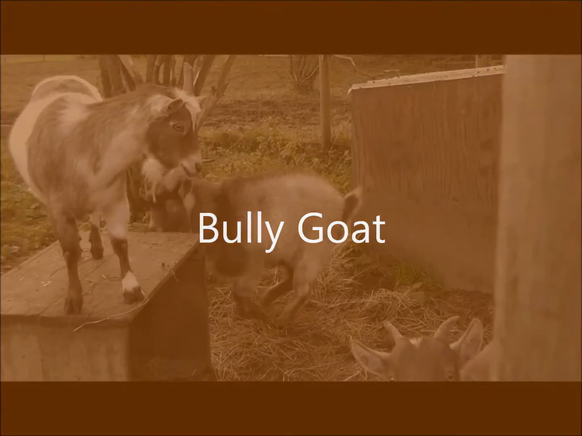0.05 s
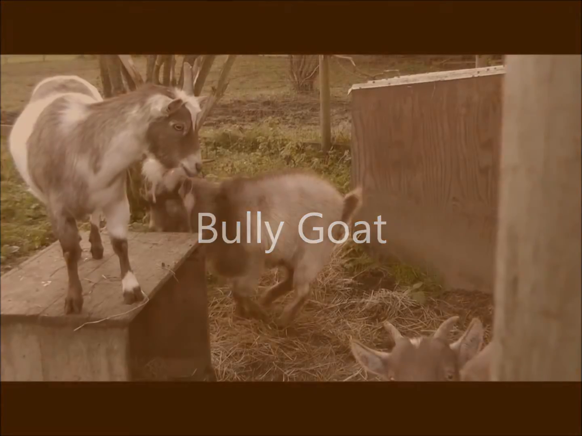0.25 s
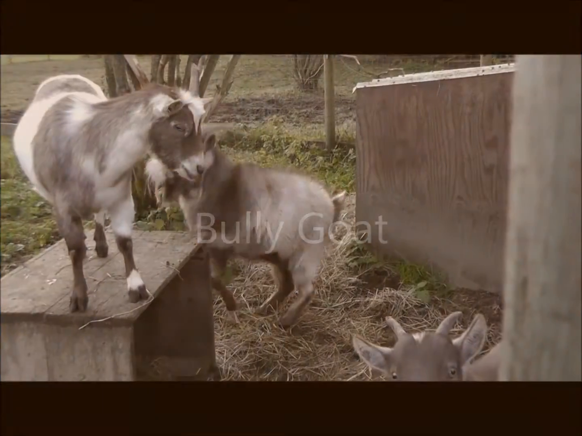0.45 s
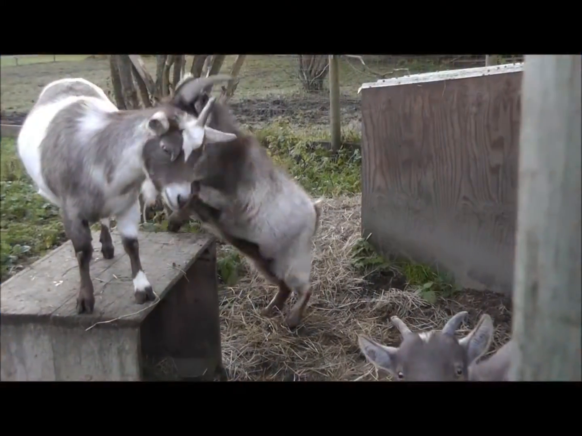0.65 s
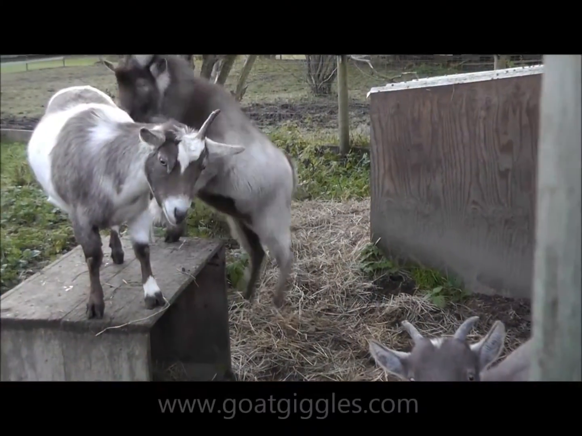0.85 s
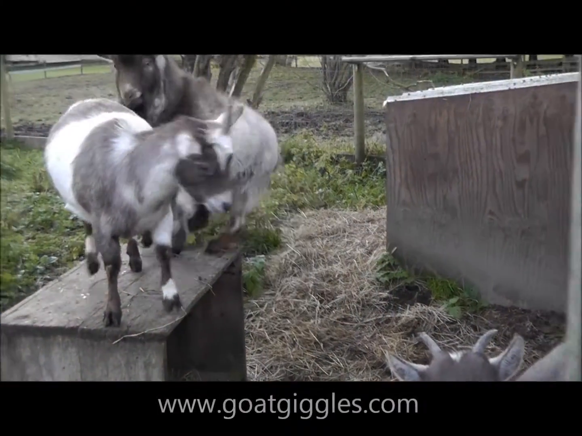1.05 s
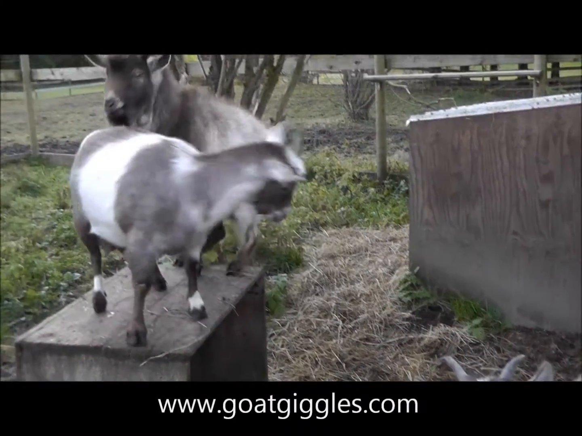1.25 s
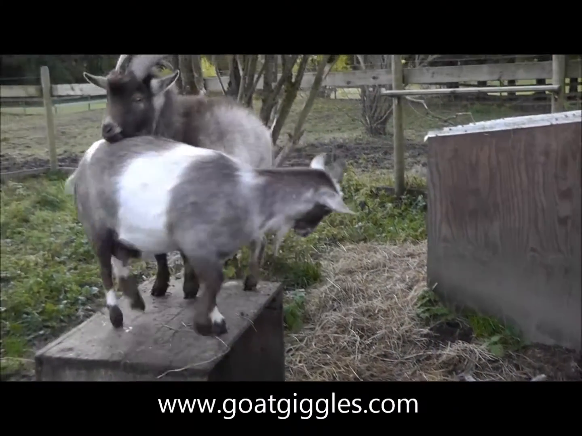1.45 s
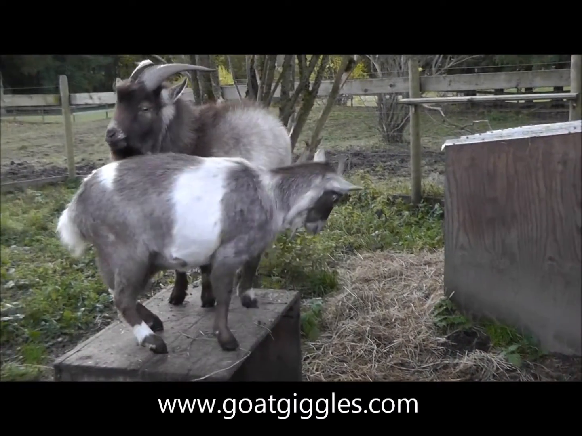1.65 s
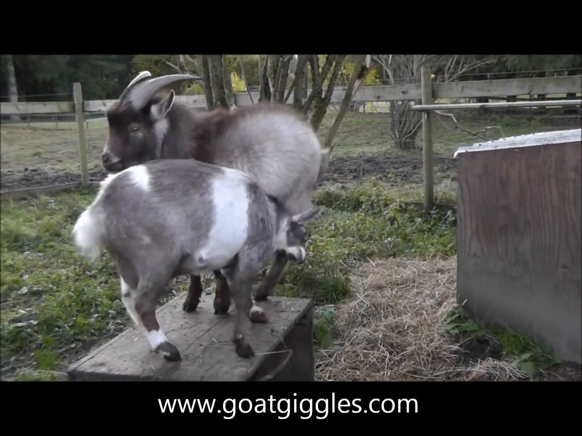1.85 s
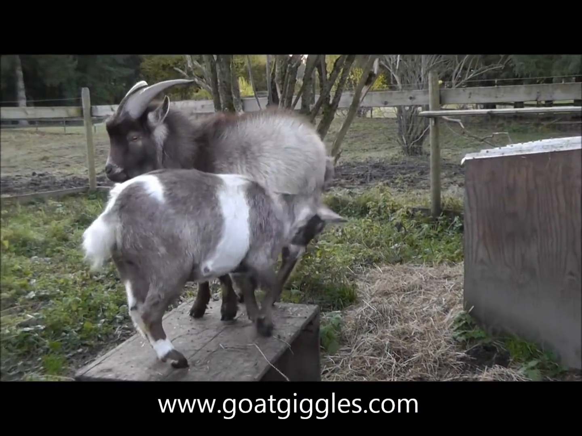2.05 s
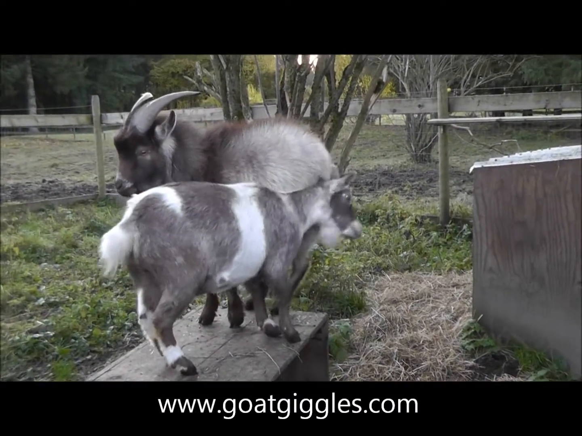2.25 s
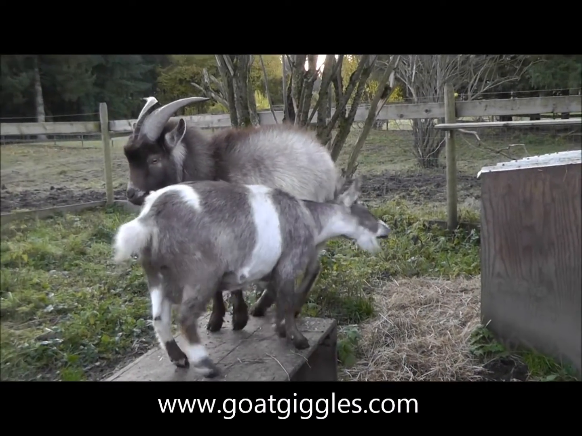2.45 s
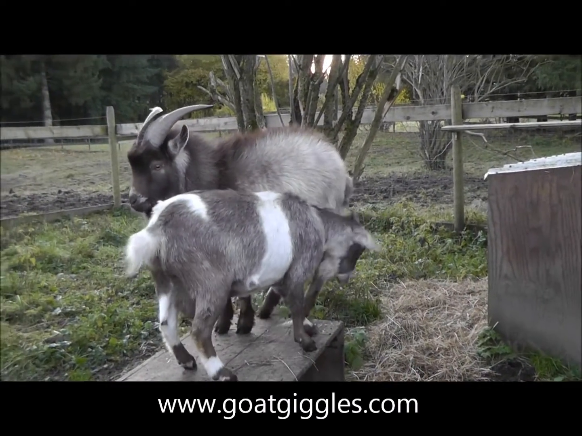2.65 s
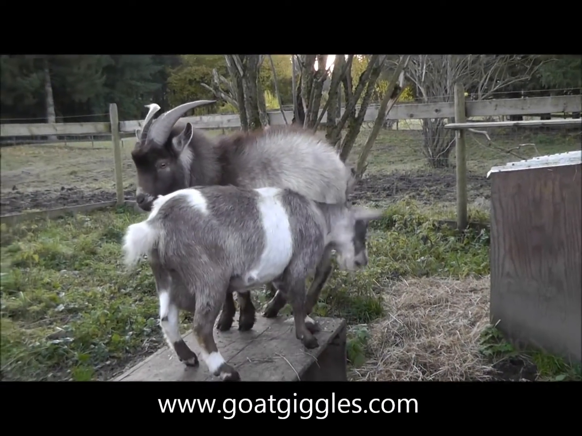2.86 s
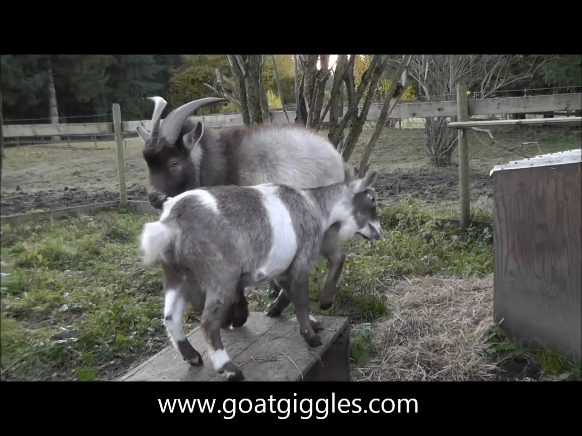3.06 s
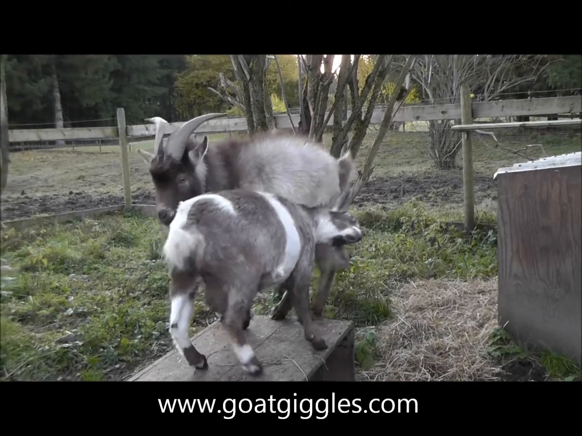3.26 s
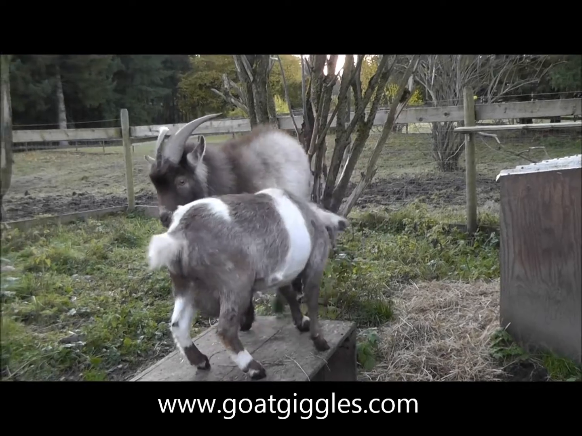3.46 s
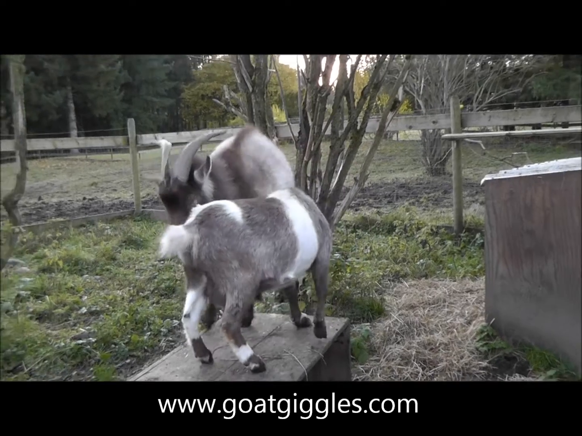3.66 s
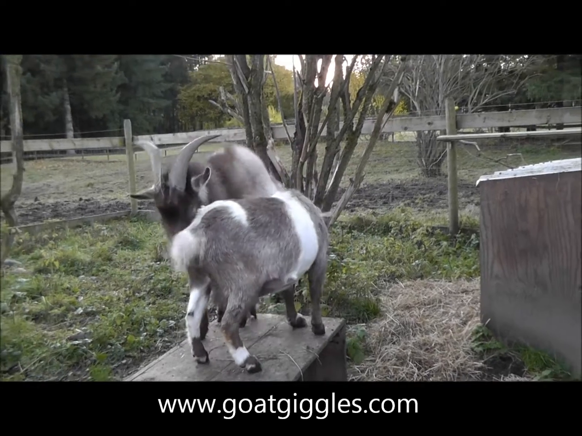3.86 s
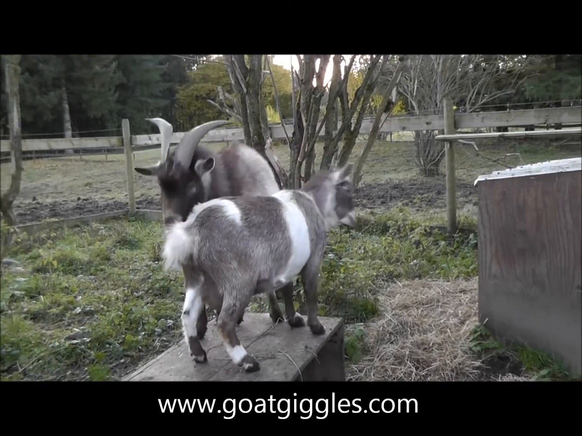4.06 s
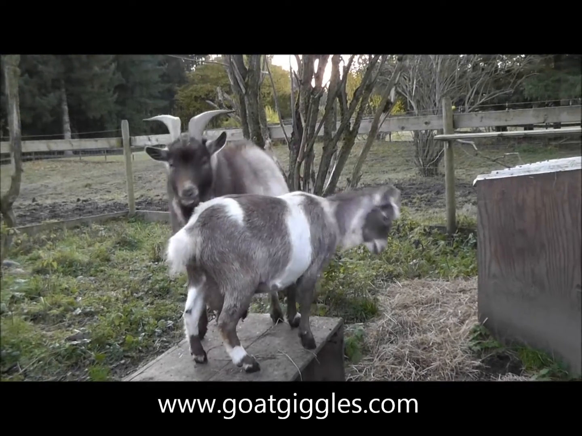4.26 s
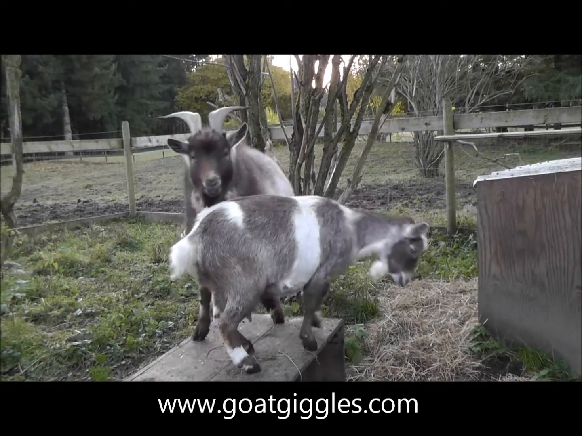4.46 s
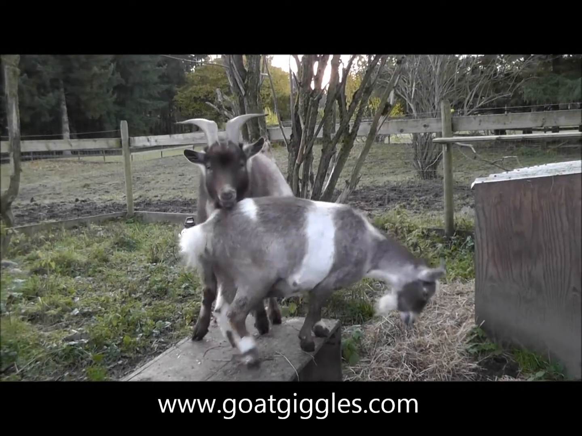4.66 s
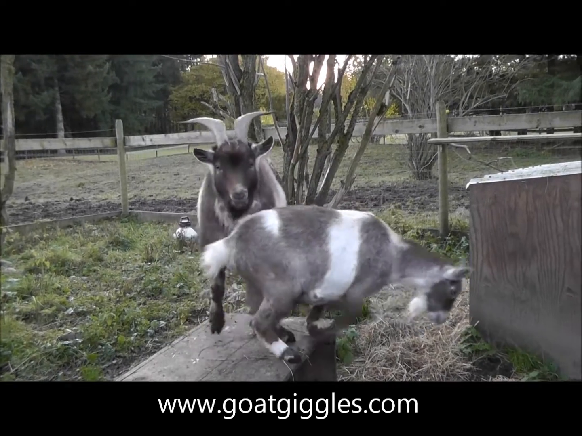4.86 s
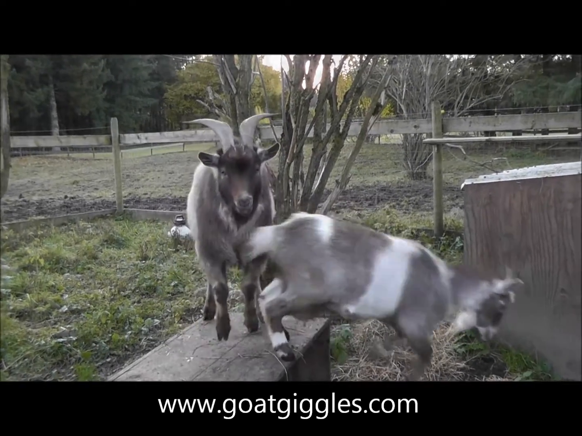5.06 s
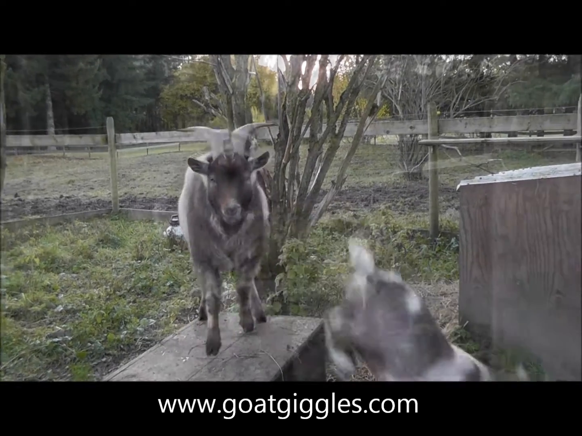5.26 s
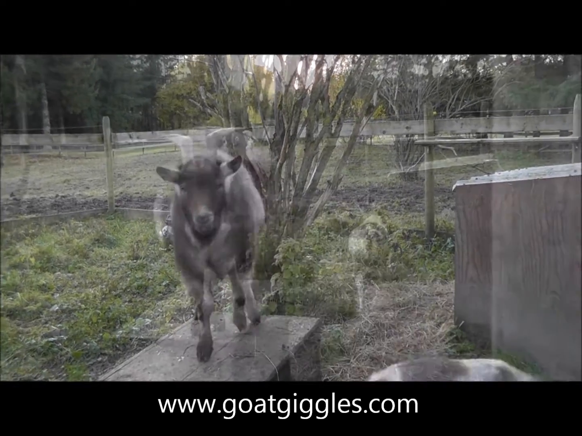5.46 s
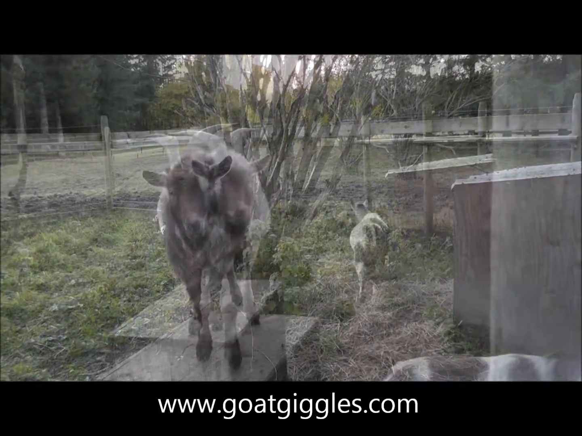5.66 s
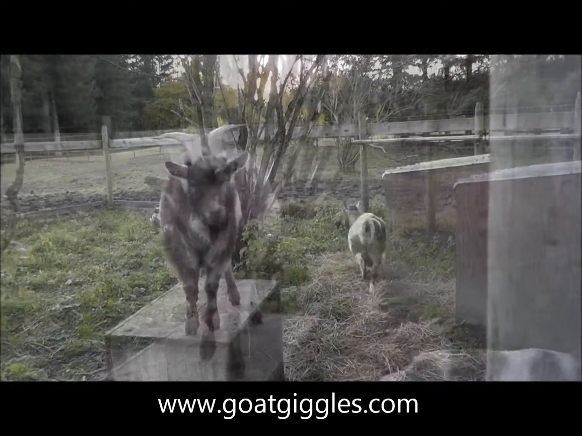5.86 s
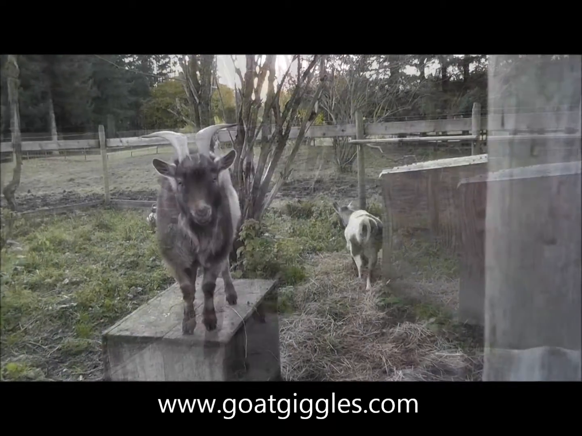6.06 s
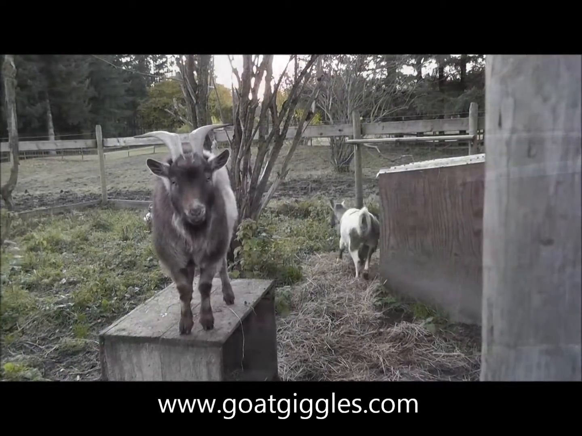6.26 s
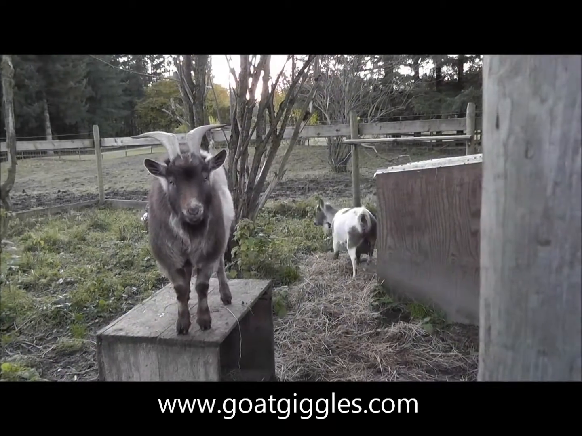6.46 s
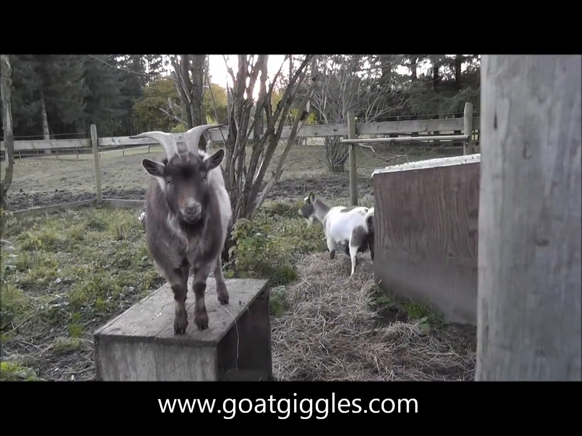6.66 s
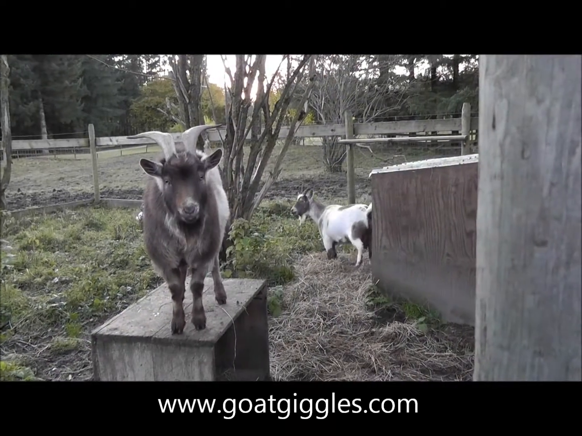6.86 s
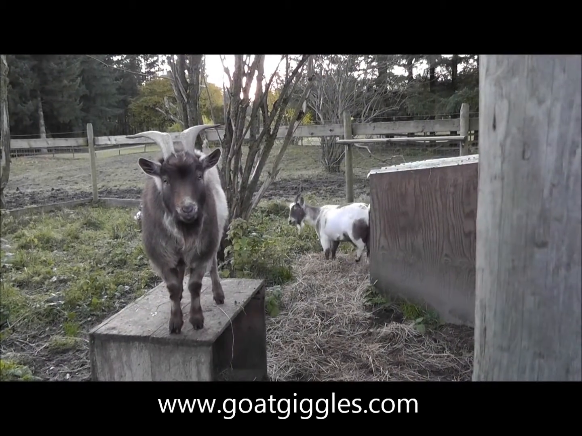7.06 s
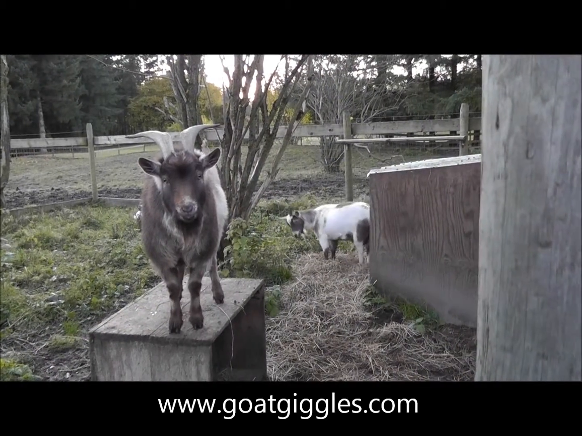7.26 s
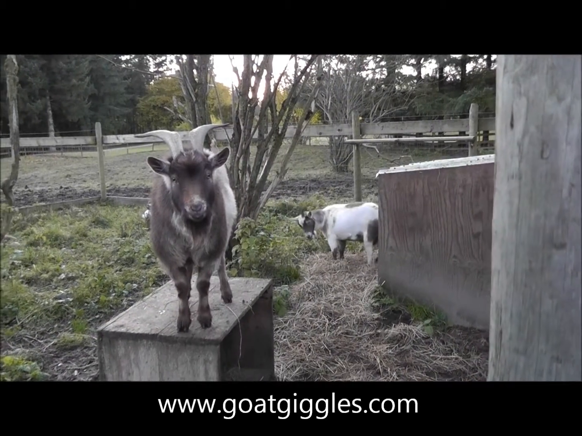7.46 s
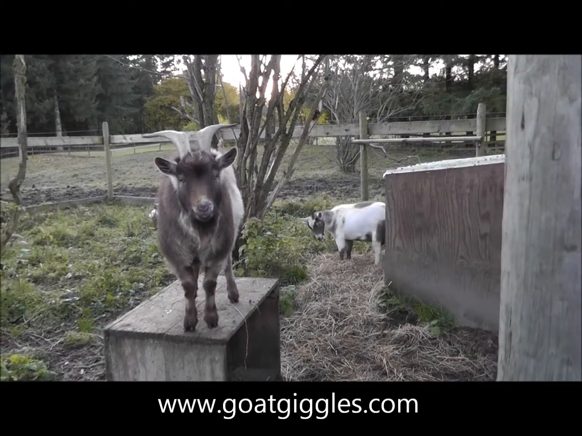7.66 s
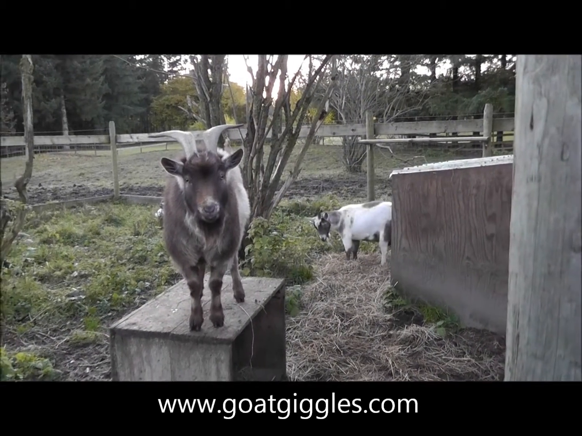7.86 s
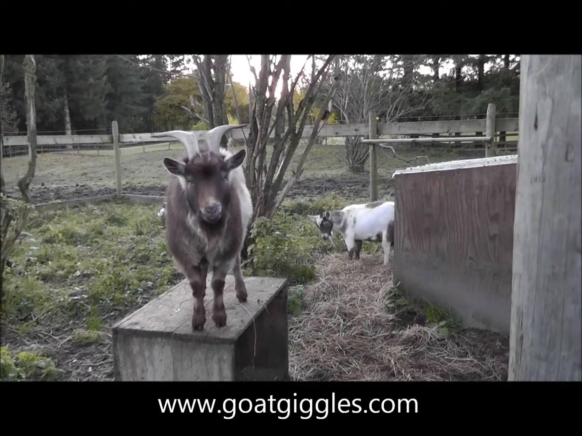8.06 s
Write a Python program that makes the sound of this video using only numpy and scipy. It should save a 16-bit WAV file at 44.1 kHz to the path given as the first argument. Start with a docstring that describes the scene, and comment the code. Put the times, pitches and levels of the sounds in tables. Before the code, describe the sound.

Goats jostle on hollow boards with sharp knocks and scuffs, four shaky bleats, a dull jump into straw, over quiet rumble and hum.

```python
"""Goats on a wooden stand

Goats jostle on a hollow wooden stand in an open pen, heard in stereo with scattered echoes around them.
Bleats come as hoarse throbs, about ten a second: glottal pulses and breath through throat and mouth resonances.
Hooves knock and skid, ringing the modes of the boards; heavy steps boom, and a jump lands dully in the straw.
Straw and coats rustle as crackling noise bands. Behind lie rumbling noise and hums of wavering tones;
midway one hum fades into another."""
import sys
import numpy as np
from scipy import signal
from scipy.io import wavfile
from scipy.ndimage import uniform_filter1d

SR = 44100
rng = np.random.default_rng(int(sys.argv[2]) if len(sys.argv) > 2 else 0)


def wav_record(signal):
    """Record a signal, one row per channel, as 16-bit PCM in the file named by sys.argv[1]."""
    frames = np.transpose(np.atleast_2d(signal))
    bounded = np.clip(frames, -1, 1)
    # unit amplitude maps onto the largest positive 16-bit level
    quanta = np.round(bounded * 32767).astype(np.int16)
    wavfile.write(sys.argv[1], SR, quanta)


N = 357562


def amp(db):
    """Turn dB into gain."""
    return 10 ** (np.asarray(db) / 20)


def rms_one(x):
    """Scale to rms 1."""
    return x / np.sqrt(np.mean(x ** 2) + 1e-20)


def at_hz(points, hz):
    """Read a curve of (Hz, value) points on a log frequency axis."""
    points = np.array(points)
    return np.interp(np.log(hz), np.log(points[:, 0]), points[:, 1])


def add(out, s, x):
    """Mix x into out from time s in seconds."""
    i = round(s * SR)
    out[..., i:i + x.shape[-1]] += x[..., :N - i]


def drift(rate_hz):
    """Slow random wander of rms 1: noise through two equal low-pass poles, run at SR / 40."""
    pole = np.exp(-80 * np.pi * rate_hz / SR)
    white = rng.standard_normal(N // 40 + 2002)
    slow = signal.lfilter([1], [1, -2 * pole, pole * pole], white)[2000:]   # drop the settling
    return np.interp(np.arange(N) / 40, np.arange(len(slow)), rms_one(slow))


def resonance(x, hz, width_hz):
    """Two-pole band resonance with a gain of 1 at its top."""
    r = np.exp(-np.pi * width_hz / SR)
    zeros = np.array([1, 0, -1]) * (1 - r * r) / 2
    return signal.lfilter(zeros, [1, -2 * r * np.cos(2 * np.pi * hz / SR), r * r], x)


def banded_noise(spectrum, patchy_db, low_hz, count):
    """Half-octave bands of stereo noise, each with its own level, flicker and left-right likeness."""
    # how alike left and right are: hz, likeness (ratio)
    likeness = [(300, 0.71), (1400, 0.16), (3100, 1), (15000, 0.62)]
    out, together = 0, drift(7.3)
    white = rng.standard_normal((2, 2, N))   # neighbouring bands take different noise
    for k in range(count):
        low = low_hz * 2 ** (k / 2)
        band = signal.butter(2, [low, low * np.sqrt(2)], "band", fs=SR, output="sos")
        mid, side = signal.sosfilt(band, white[k % 2])
        centre_hz = low * 2 ** (1 / 4)
        alike = np.clip(at_hz(likeness, centre_hz), -1, 1)
        gain = amp(at_hz(spectrum, centre_hz) + patchy_db * (together + drift(4.0)))
        out = out + gain * (np.sqrt(1 + alike) * mid + np.sqrt(1 - alike) * side * [[1], [-1]])
    return rms_one(out)


def cavity(source, resonances, shift=1):
    """Air in throat or mouth: parallel resonances of alternating sign, moved by the ratio shift."""
    out = 0
    for k, (hz, width_hz, db) in enumerate(resonances):
        ring = resonance(resonance(source, hz * shift, width_hz), hz * shift, 4 * width_hz)
        out = out + (-1) ** k * amp(db) * ring
    return out


def breath_rasp(excitation, shift, treble_db):
    """Hiss of breath in broad bands, those above the mouth resonances set by treble_db."""
    # hiss bands: centre_hz (before the mouth shift), width_hz, level_db (before treble_db)
    rasp_bands = [(3720, 1160, -9.5), (5070, 180, -21), (6410, 2920, -15), (9900, 42000, -25.5)]
    out = 0
    for hz, width_hz, db in rasp_bands:
        band = resonance(resonance(excitation, hz * shift, width_hz), hz * shift, 2 * width_hz)
        out = out + amp(db + treble_db * (hz > 4810)) * rms_one(band)
    return out


def glottis(t, length, middle_hz, glide_hz, rough):
    """The folds give pulses of 29 harmonics with uneven pitch and strength, and breath gated each cycle."""
    chance = rng.standard_normal((3, len(t)))
    wobble = rms_one(uniform_filter1d(chance[0], size=350))
    # the folds tighten at the height of the push, in some throbs more than in others
    arch = 1 + rng.uniform(.03, .19) * (np.exp(-(2 * t / length) ** 2) - .5)
    ends_hz = [middle_hz - glide_hz / 2, middle_hz + glide_hz / 2]
    pitch = np.interp(t, [-length / 2, length / 2], ends_hz) * arch * (1 + .022 * rough * wobble)
    phase = np.cumsum(pitch) / SR   # in cycles
    shimmer = amp(4 * rough * rms_one(uniform_filter1d(chance[1], size=100)))
    harmonics = np.arange(1, 30)[:, None]
    pulses = rms_one(shimmer * np.cos(2 * np.pi * harmonics * phase).sum(axis=0))
    breath = rms_one(chance[2] * np.exp(-6 * (phase % 1)))
    return pulses, breath


def bleats(low_lag_s=0.006, closing=0.032, voiced_rasp=1.1, throat_db_per_shift=-40):
    """Each throb sends pulses and breath through throat and mouth, under a swelling envelope."""
    # throbs: centre_s, length_s, level_db (mouth rms ahead of its swell), pitch_hz and glide_hz across
    # the throb (before arch and wobble), mouth_shift (ratio)
    throbs = [(2.649, 0.036, -35, 360.6, -33, 1.03), (2.743, 0.038, -36, 474, -4, 0.97),
              (2.827, 0.043, -17, 440, -41.5, 0.97), (2.933, 0.047, -23, 388, -12, 1.1),
              (3.018, 0.05, -20.5, 401.2, -19, 1.04), (3.1, 0.024, -23, 353.8, -40.5, 1.046),
              (4.983, 0.052, -44.5, 411.3, 24, 1.02), (5.087, 0.04, -23.5, 429, 35.5, 0.94),
              (5.177, 0.056, -23.5, 417, 30.5, 0.92), (5.275, 0.054, -22.5, 429.3, 34.5, 0.93),
              (5.377, 0.055, -24.5, 414, 7, 0.93), (5.682, 0.044, -41.5, 355, 9.5, 1.05),
              (5.78, 0.038, -40, 446, -17.5, 0.92), (5.891, 0.033, -20, 454.3, -62.5, 0.93),
              (5.979, 0.041, -19, 444, 65, 0.96), (6.078, 0.052, -20.5, 462.5, 45.5, 0.96),
              (6.167, 0.057, -27, 376.4, -39, 0.99), (6.934, 0.035, -44, 331, 31, 1.2),
              (7.028, 0.04, -21, 386, 29, 1.07), (7.117, 0.031, -19.5, 400, 42, 1.05),
              (7.22, 0.044, -24.5, 414.4, 29, 0.95), (7.315, 0.056, -25.5, 317.1, -30, .98)]
    # how the goat holds its voice: time_s, roughness (0-1), treble_db, peak_lateness (-1 to 1)
    voice_hold = [(2.65, 0.54, -0.5, 0.3), (2.829, 0.37, -1, -0.5), (3.099, 0.5, -3, 0.7),
                  (5.09, 0.38, -6, 0.1), (5.889, 0.26, -3, -0.2), (6.17, 0.54, -4.5, 0.3),
                  (6.93, 0.34, -4, 0.5), (7.32, 0.7, -1, -0.1)]
    # throat resonances: hz, width_hz, level_db (before the mouth opens)
    throat_modes = [(650, 172, 4.5), (1540, 236, -4.5), (2076, 92, 5.5)]
    # mouth resonances: hz (before the mouth shift), width_hz, level_db
    mouth_modes = [(2943, 400, 6), (3610, 320, 12), (4150, 200, 1.5), (4810, 830, -7)]
    out = np.zeros(N)
    when, *manner = np.transpose(voice_hold)
    t = np.arange(-.1, .1, 1 / SR)
    for s, length, level_db, middle_hz, glide_hz, shift in throbs:
        rough, treble_db, lateness = (np.interp(s, when, column) for column in manner)
        pulses, breath = glottis(t, length, middle_hz, glide_hz, rough)
        through = t / length + .5   # 0 at the start of the throb, 1 at its end
        rough = np.clip(rough + .13 * np.clip(through, 0, 2) ** 2, 0, 1)   # hoarser as the push fades
        source = np.sqrt(1 - rough ** 2) * pulses + rough * breath

        # the mouth sinks from shift + closing to shift - closing
        wide = cavity(source, mouth_modes, shift + closing)
        narrow = cavity(source, mouth_modes, shift - closing)
        mouth = wide + np.clip(through, 0, 1) * (narrow - wide)
        # the low throat weakens as the mouth opens
        throat = amp(throat_db_per_shift * (shift - 1)) * cavity(source, throat_modes)
        rasp = breath_rasp(breath + voiced_rasp * source, shift, treble_db) * np.std(mouth)

        # an early peak breaks in fast, a late one breaks off
        lateness, reach = np.clip(lateness, -.9, .9), 0.53 * length
        u = t - lateness * reach
        mouth_swell = np.exp(-(abs(u) / (reach * (1 - lateness * np.sign(u)))) ** 4.0)
        throat_swell = np.exp(-(abs(t - low_lag_s) / (.5 * length)) ** 2)   # peaks low_lag_s late
        rasp_swell = np.exp(-(t / (np.where(t < 0, .7, 1.1) * length)) ** 2)
        throb = mouth * mouth_swell + rasp * rasp_swell + throat * throat_swell
        add(out, s + t[0], throb * amp(level_db) / np.std(mouth))
    return out


def knocks(deep_db=-16, soft_hz=1800, lag_s=0.00256, knock_contact_s=0.0045):
    """A short uneven contact drives every mode of the stand at a chance strength; lower modes start later."""
    # hooves knock on the boards: time_s, peak_db (middle modes), upper_modes_db (against the middle)
    hoof_knocks = [(0.797, -8, -21), (0.903, -15.5, -2.5), (1.242, -18, -5.5), (1.622, -15, -1.5),
                   (2.06, -26, -31), (2.226, -14, -3), (2.537, -21, -2.5), (3.112, -25.5, 3.5),
                   (3.207, -30, 5.5), (3.333, -8.5, -6.5), (3.746, -3, -9.5), (3.801, -35.5, 14),
                   (4.068, -32.5, 16), (4.253, -24, -0.5), (4.459, -12.5, -1.5), (4.567, -24, 4),
                   (4.6, -7, -28), (4.794, -17, -5.5), (4.843, -16.5, -2), (5.357, -13.5, -8.5),
                   (6.183, -24.5, 2)]
    # hooves skid on the boards: as above, then contact_s (the push fades over 2.62 contacts)
    skids = [(1.049, -19.5, -6, 0.015), (1.117, -15, -5.5, 0.0074), (1.164, -14, -3.5, 0.0082),
             (1.463, -24.5, -15, 0.0051), (1.533, -11.5, -0.5, 0.007), (1.722, -12, -3.5, 0.01),
             (3.437, -35.5, 22.5, 0.016), (3.678, -31.5, 6.5, 0.012), (5.456, -7, -35, 0.027)]
    # modes of the stand: hz (before detuning), level_db (before chance and group levels), t60_s
    stand_modes = [(126, 14, 0.105), (256, 0, 0.033), (634, -4, 0.037), (724, 4.5, 0.024),
                   (860, -5.5, 0.027), (1189, 1, 0.015), (1850, -5, 0.0041)]
    out, t = np.zeros(N), np.arange(SR // 2) / SR
    edges_hz = [60, 190, 450]   # lower edges of the deep, middle and upper modes
    soft = signal.butter(3, soft_hz, fs=SR, output="sos")   # horn on wood is a soft contact
    contacts = [(*knock, knock_contact_s) for knock in hoof_knocks] + skids
    for s, peak_db, upper_db, contact_s in contacts:
        push = np.minimum(t / 0.0038, 1) * np.exp(-(t / (2.62 * contact_s)) ** 2.25)
        force = rng.standard_normal(len(t)) * push
        groups = np.zeros((len(edges_hz), len(t)))
        chances = rng.standard_normal((len(stand_modes), 2))
        for (hz, db, t60), (luck, spot) in zip(stand_modes, chances):
            hz = hz * (1 + .05 * spot)   # weight on the boards detunes them
            width_hz = np.log(1000) / (np.pi * t60)
            mode = resonance(resonance(force, hz, width_hz), hz, 6 * width_hz)
            groups[np.searchsorted(edges_hz, hz) - 1] += amp(db + 3 * luck) * rms_one(mode)
        levels_db, lags_s = [deep_db, 0, upper_db], [2 * lag_s, lag_s, 0]
        for group, db, lag in zip(signal.sosfilt(soft, groups), levels_db, lags_s):
            add(out, s + lag, amp(peak_db + db) * group / abs(group).max())
    return out


def thuds(boom_hz=105, width_hz=55, push_s=0.0089):
    """A soft push into the hollow under the boards makes the stand boom."""
    # a goat's weight comes down: time_s, peak_db
    heavy_steps = [(1.74, -24), (2.244, -24), (4.268, -26.5), (4.471, -22), (5.468, -15)]
    out, t = np.zeros(N), np.arange(SR // 4) / SR
    for s, peak_db in heavy_steps:
        push = rng.standard_normal(len(t)) * t * np.exp(-t / push_s)
        boom = resonance(resonance(push, boom_hz, width_hz), boom_hz, width_hz)
        add(out, s, amp(peak_db) * boom / abs(boom).max())
    return out


def landing():
    """A jump down into the straw: dull, grainy low-passed noise that dies away."""
    # the jump: time_s, level_db (at the start, before the grain), fading_s, dullness_hz
    s, level_db, fading_s, dull_hz = (5.5, -27.5, 0.34, 339)
    t = np.arange(N) / SR - s
    band = signal.butter(1, [70, dull_hz], "band", fs=SR, output="sos")
    dull = signal.sosfilt(band, rng.standard_normal(N))
    dull = signal.sosfilt(signal.butter(2, 1300, fs=SR, output="sos"), dull)
    grain = amp(level_db + 2.2 * drift(30))
    return rms_one(dull) * grain * np.exp(-np.maximum(t, 0) / fading_s) * (t > 0)


def lean(x, tilt_db=6, split_hz=440):
    """Place the stand: upper modes radiate to the left, lower ones a fifth as far (in dB) to the right."""
    upper = signal.sosfilt(signal.butter(2, split_hz, "high", fs=SR, output="sos"), x)
    side_db = tilt_db * np.array([[.5], [-.5]])
    return amp(side_db) * upper + amp(-side_db / 5) * (x - upper)


def scuffs():
    """Dense uneven slips excite one broad resonance, a band of grainy hiss that swells and dies."""
    # scuffs: time_s, length_s, level_db (rms ahead of the swell), centre_hz
    slides = [(1.033, 0.097, -49.5, 3140), (1.426, 0.17, -48.5, 1800), (6.334, 0.106, -43, 5100)]
    out = np.zeros(N)
    for s, length, level_db, hz in slides:
        swell = signal.windows.tukey(round(length * SR), .3)
        slips = rng.standard_normal(len(swell)) * amp(5 * drift(60)[:len(swell)])
        hiss = rms_one(resonance(resonance(slips, hz, .5 * hz), hz, hz))
        add(out, s, amp(level_db) * swell * hiss)
    return out


def straw():
    """Bursts and a rustle broken by tiny crackles; single stalks snap, each with a pitch of its own."""
    # rustling of straw and coats: time_s, level_db (before the crackles)
    rustle = [(.5, -63.5), (4.9, -61), (5.4, -45.5), (5.8, -55), (6.4, -53.5), (6.6, -64.5)]
    # spectrum of the rustle: hz, density_db (relative, per Hz)
    rustle_colour = [(1500, -8), (3000, 0), (16000, -2)]
    # bursts of crushed straw: time_s, level_db (before onset, fade and crackles), fading_s
    bursts = [(0.228, -46, 0.1), (0.431, -44.5, 0.025), (0.831, -46, 0.053), (1.05, -53.5, 0.11),
              (1.727, -44, 0.02), (3.434, -46.5, 0.045), (3.68, -47, 0.03), (5.458, -42, 0.038)]
    # single stalks snap: time_s, peak_db (before panning)
    snaps = [(1.013, -42), (3.3343, -30), (3.6567, -35), (3.914, -36), (4.155, -37), (4.233, -31.5),
             (4.9781, -32), (6.32, -31), (6.358, -42)]
    t = np.arange(N) / SR
    level = amp(np.interp(t, *np.transpose(rustle)))
    for s, level_db, fading_s in bursts:
        burst = np.minimum(t[:SR] / 0.0022, 1) * np.exp(-(t[:SR] / fading_s) ** 2)
        add(level, s, amp(level_db) * burst)

    # about 90 crackles a second until the last rustle point, each decaying over 1.5 ms
    ticks = (rng.random(N) < 90 / SR) * rng.exponential(1, N) * (t < rustle[-1][0])
    crackle = signal.lfilter([1], [1, -np.exp(-1 / (.0015 * SR))], ticks)
    level = level * (1 + .9 * crackle)
    out = level * banded_noise(rustle_colour, patchy_db=1.5, low_hz=1040, count=8)

    u = t[:SR // 20]
    chances = rng.uniform([5000, -4], [10000, 4], (len(snaps), 2))   # pitch Hz, pan dB
    for (s, peak_db), (hz, pan_db) in zip(snaps, chances):
        snap = resonance(rng.standard_normal(len(u)) * np.exp(-u / 0.0019), hz, hz)
        add(out, s, amp(peak_db + pan_db * np.array([[1], [-1]])) * snap / abs(snap).max())
    return out


def pen(x, t60, dull_hz, spread):
    """Scattered echoes from shed, fence and ground after 8 ms, partly different in each channel."""
    t = np.arange(SR // 2) / SR
    mid, side = rng.standard_normal((2, len(t))) * amp(-60 * t / t60) * (t > .008)
    dull = signal.butter(1, dull_hz, fs=SR, output="sos")
    tail = signal.sosfilt(dull, mid + spread * side * [[1], [-1]])
    tail = tail / np.sqrt(np.sum(tail ** 2) / 2)
    return signal.fftconvolve(x[None], tail, axes=1)[:, :N]


def hum(lines, waver_db):
    """Steady tones whose levels waver slightly."""
    t = np.arange(N) / SR
    out = 0
    for hz, db in lines:
        out = out + np.sqrt(2) * amp(db + waver_db * drift(4.5)) * np.sin(2 * np.pi * hz * t)
    return out


def fading_hums():
    """One hum gives way to another in a linear crossfade."""
    # tones of each hum: hz, level_db (rms, before wavering, fading and panning)
    first_hum = [(80.7, -51), (199.2, -46.5), (398.4, -52)]
    second_hum = [(80.7, -50), (161.5, -51), (317.6, -47.5)]
    # the crossfade: start_s, end_s
    fade_s = (5.23, 5.3)
    fade = np.interp(np.arange(N) / SR, fade_s, [0, 1])
    return (1 - fade) * hum(first_hum, waver_db=1.2) + fade * hum(second_hum, waver_db=1.2)


def distant_rumble(level_db=-43.5):
    """Distant rumble: stereo noise, strongest in the bass, whose bands flicker."""
    # spectrum of the rumble: hz, density_db (relative, per Hz)
    rumble_colour = [(25, -49), (60, -3), (150, 1.5), (400, -5.5), (800, -6.5), (1500, -24), (6000, -42.5)]
    return amp(level_db) * banded_noise(rumble_colour, patchy_db=.8, low_hz=25.3, count=16)


def scene():
    """Mix all sources, placed left to right, with the echoes of the pen."""
    voice = bleats()
    hooves = knocks() + thuds() + landing()
    hums = fading_hums()
    near = voice * amp([[-.2], [.2]]) + lean(hooves)
    voice_echoes = amp(-12.5) * pen(voice, t60=0.26, dull_hz=5840, spread=0.75)
    hoof_echoes = amp(-18.5) * pen(hooves, t60=0.18, dull_hz=1080, spread=0.48)
    background = (hums + distant_rumble()) * amp([[-.7], [.7]])
    return near + voice_echoes + hoof_echoes + straw() + scuffs() + background


def record(dry, start_s=0.2336, cutoff_hz=15900):
    """The microphone cuts the bass and dips at its housing; silence until start_s, and a steep top cut."""
    # dips of the microphone housing: hz, width_hz
    housing_dips = [(1800, 133), (2400, 130), (3050, 80)]
    x = signal.sosfilt(signal.butter(2, 50, "high", fs=SR, output="sos"), dry)
    for hz, width_hz in housing_dips:
        x = x - resonance(x, hz, width_hz)
    x = x * np.clip((np.arange(N) / SR - start_s) / 0.016, 0, 1)   # fades in over 16 ms
    # the filter's stopband begins 3 % above the cutoff
    return signal.sosfilt(signal.cheby2(14, 70, cutoff_hz * 1.03, fs=SR, output="sos"), x)


dry = scene()
out = record(dry)
wav_record(out)
```